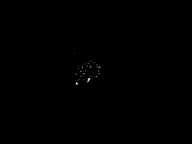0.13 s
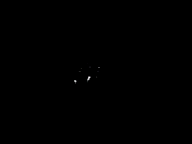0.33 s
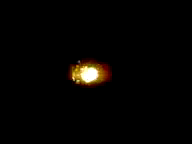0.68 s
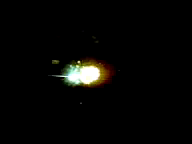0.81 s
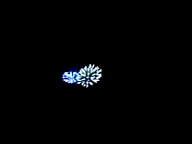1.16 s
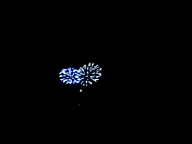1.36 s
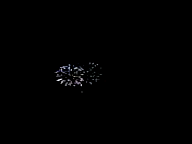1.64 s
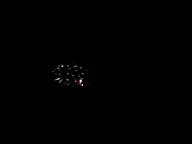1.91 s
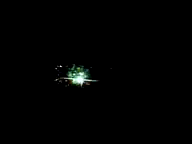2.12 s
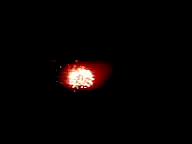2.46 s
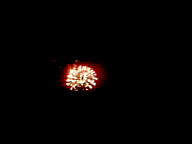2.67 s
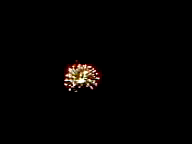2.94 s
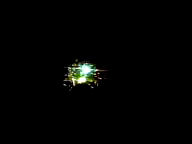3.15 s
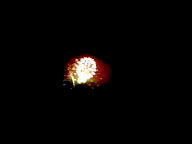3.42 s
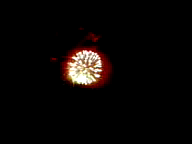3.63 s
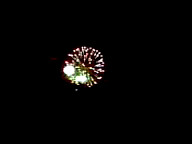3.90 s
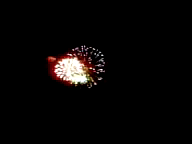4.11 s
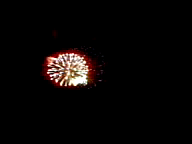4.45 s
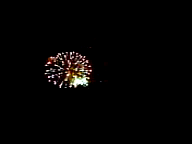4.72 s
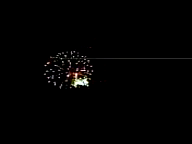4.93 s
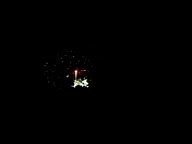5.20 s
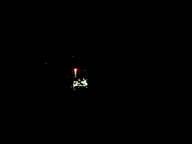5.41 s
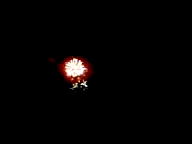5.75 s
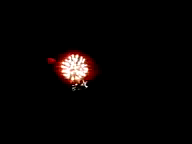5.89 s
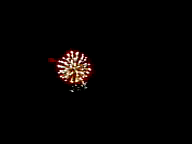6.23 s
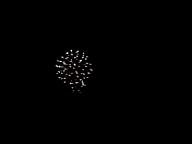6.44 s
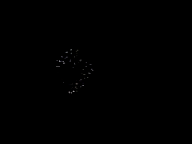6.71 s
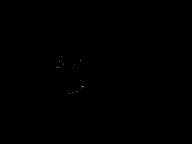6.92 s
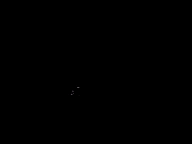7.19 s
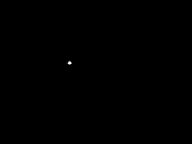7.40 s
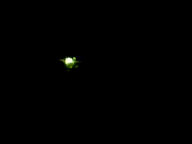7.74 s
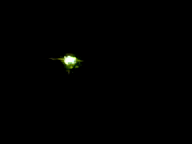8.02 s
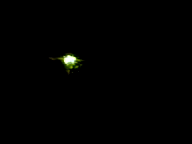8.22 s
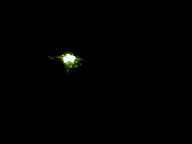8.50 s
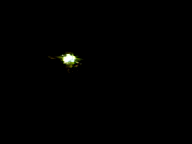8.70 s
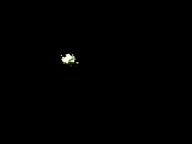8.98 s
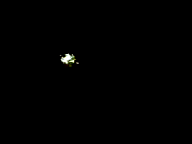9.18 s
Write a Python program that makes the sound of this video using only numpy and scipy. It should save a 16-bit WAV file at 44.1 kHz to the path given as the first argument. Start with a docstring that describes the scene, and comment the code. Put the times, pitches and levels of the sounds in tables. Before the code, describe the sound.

Fireworks at night, heard from afar in a built-up neighbourhood through a small, boxy microphone with little deep bass or treble. A faint, nearly steady rumble and slight hiss lie underneath. A moderate bang opens at 0 s and fades. Weak pops tick at 0.5 to 1.05 s, then stronger ringing mortar cracks at 1.2 and 1.3 s. Big clipped shell booms hit at 1.55 and 1.9 s, with another launch crack overlapping the second, and a hollow mortar shot at 2.5 s. More booms follow at 3.2, 3.65 (a bit lighter), 4.25 and 5.0 s, with a weaker crack at 4.1 s. A short dry mortar crack comes at 5.8 s, then a heavy boom at 6.6 s with a smeared echo. Each boom has rapid wall slaps and a rolling decay under a second. After near quiet, a softer, duller-edged, higher-pitched bang sounds at 8.4 s and fades into rumble.

```python
"""A neighbourhood at night, with fireworks heard from afar over a faint, nearly steady rumble.
Smeared late echoes, short or long: each starts at once without an added click, then dies away.
Mortars crack on the ground: each shot is a sharp front, a ringing tube and echoes from fixed walls.
Shells boom overhead: a shock front, a burst of near echoes, wall returns and a long far roll.
A small, narrow-band microphone colours it all, clips the loudest bangs and adds a little hiss."""
import sys
import numpy as np
from scipy import signal
from scipy.fft import rfft, irfft
from scipy.io import wavfile
from scipy.ndimage import uniform_filter1d

SR = 44100
rng = np.random.default_rng(int(sys.argv[2]) if len(sys.argv) > 2 else 0)


def store_pcm(level_fs):
    """Save levels as 16-bit WAV."""
    pcm = np.round(np.clip(level_fs, -1, 1) * 32767).astype(np.int16)
    wavfile.write(sys.argv[1], SR, np.atleast_2d(pcm).T)


N = 412776

# All levels in the event and wall tables are relative; offsets further down are added to them.
# Shells bursting in the air: (time [s], front level [dB], edge [dB], ring pitch [Hz], ring [dB],
# crack of the far roll [dB], near echoes [dB], far roll [dB], far roll fade [dB/s],
# last far echo after the burst [s], wall returns [dB], hold of near echoes [s], crack of near echoes [dB])
SHELL_BURSTS = [(0.003, -6, -0.5, 352.6, 6, 4.5, -24, -26.5, 42.5, 0.89, -22, 0.011, 0),
                (1.557, 5.5, 2, 347.5, 4, 3, -10.5, -20.5, 54, 0.76, -2.5, .035, 0.3),
                (1.913, 6, 4, 341, 7, 4, -11.5, -27, 34, 0.68, -1.5, 0.016, 1),
                (3.233, 5, -1.5, 268, 6.5, 2, -9, -20, 50, 0.395, 1, 0.028, -0.5),
                (3.649, 1, -0.5, 422.5, -2.5, 1.5, -14, -23.5, 83, .5, -15, 0.0067, 4.5),
                (4.24, -0.5, 2.5, 279, 2.5, 3, -10, -22, 48, 0.56, 0, 0.024, -1.5),
                (4.993, 7, -1, 320, 3.5, 1.5, -10.5, -18, 56, 0.44, -2.5, 0.0313, 1.8),
                (6.627, 7.5, 0, 327.8, -1, 0, -9, -22.5, 39.5, 0.67, -2, 0.027, 0.34),
                (8.368, -5, -8.5, 620, 1, 1, -18, -23, 77.5, 0.8, -8.5, 0.024, 1)]
# Walls that return each burst: (delay [s], level [dB], crack [dB], smear [s])
SHELL_WALLS = [(.012, -4, 2, .011), (0.0224, 1.5, 2, .012), (.034, -5, -1, .01), (.06, -17.5, 2, .012),
               (0.086, -3.5, -5, 0.015)]
# Mortars firing on the ground: (time [s], level [dB], crack [dB], edge [dB], extra fade [dB/s],
# ring pitch [Hz], ring [dB], scattered echoes [dB], muzzle and near walls [dB], far walls [dB])
MORTAR_SHOTS = [(0.5064, -27, -3, 11.5, -5, 1670, 6.5, -13.5, 2, 0),
                (0.7657, -27.5, -3.5, 1.5, -1, 1626, 0, -16.5, -1, -2),
                (1.0522, -38, -4.5, -4.5, -1.5, 1800, 9, -18.5, -2.5, -5),
                (1.1831, -13, 1, -7, -1.5, 1644, 5, -17, 0.1, -3.5),
                (1.2728, -8, 9, 2, 3, 1401, 13, -21, 1, -2),
                (1.7788, -24.5, -8.5, 4.5, 4.5, 1800, 11.5, -15, 3, 0.5),
                (1.9302, -5.5, -1.5, -9.5, 9.5, 1725, 7, -21, -0.1, 0.2),
                (2.4719, -6, -4, -3.5, -6.5, 1732, -0.5, -21, 2, 0),
                (4.1068, -17, 9.5, 2.46, -0.7, 1497, 7.5, -17.5, 4, 7),
                (4.94, -42.5, 0.3, 7, 3.5, 1657, 1, -16, -2, -6.5),
                (5.8175, -8.5, 0.4, -1.3, 26, 1656, 0, -12, 1.5, 1)]
# Walls that return each mortar shot: (delay [s], crack and ring [dB], front [dB], smeared part [dB], smear [s])
MORTAR_WALLS = [(.0045, 1.5, -3.2, 0.6, 0.0023), (0.028, -0.2, -9.5, -3, 0.0037),
                (0.0335, 1.25, -2.66, 2.5, 0.0034), (0.0879, -1, 1, 2, 0.0056), (.112, 0.86, -12, 3, .012),
                (0.273, 2, -60, -20, 0.049)]
# Smeared late echoes, short or long: (time [s], level [dB], crack [dB], smear [s], ring [dB])
LATE_ECHOES = [(0.648, -34, 12, 0.11, 21), (0.854, -27, 3.5, 0.036, 0), (1.527, -15.5, 3, 0.0167, -1),
               (2.858, -43, 5, 0.048, 23), (4.714, -28.5, 9.5, 0.11, -13), (5.099, -26.5, 0, 0.33, -9),
               (5.428, -24, 6, 0.061, 5.5), (6.099, -35, 3, .054, 5), (6.705, -5.5, -1, 0.028, -2),
               (0.046, -8.5, -1.5, 0.018, -12), (6.999, -29.5, 5, 0.11, 8), (7.209, -37, 0, 0.078, -7)]
# Borders between the bands: (thud to boom [Hz], boom to crack [Hz], crack to edge [Hz])
BAND_BORDERS_HZ = (160, 1050, 2300)
# Night rumble before the bands are cut: (thud [dB], boom [dB], crack [dB], edge [dB])
RUMBLE_DB = (-66.5, -64, -64.5, -73)
# Fading of the shell echoes: (thud [dB/s], boom [dB/s], crack [dB/s], edge [dB/s], ring [dB/s])
SHELL_BAND_FADES = (1.5, 4, 0, 5.5, 9)
# Fading of the mortar echoes, before each shot's extra fade:
# (thud [dB/s], boom [dB/s], crack [dB/s], edge [dB/s], ring [dB/s])
MORTAR_BAND_FADES = (1, 1.5, 13, 1.7, 3)
# Shape of the microphone's response: (frequency [Hz], relative level [dB])
MICROPHONE_CURVE = [(18, -60.5), (30, -30.5), (96, -16), (166, -16.5), (317, -4.5), (461, -4.5),
                    (657, -2.5), (776, -5.5), (1230, -5.5), (1610, -2), (1790, -5), (2390, -25),
                    (2710, -25.5), (3200, -16), (4380, -46), (5690, -61.5), (9640, -120)]

SPAN_S, LEAD_S = 1.2, 0.01  # length of each sound, and the part of it before the bang
GRAIN_DB, GRAIN_HZ = 1.5, 250  # fine, fast unevenness of the echoes
LUMP_DB, LUMP_HZ = 2.4, 24.06  # coarser clumps, separate in each band
ECHO_SMEAR_DB = -19.5  # smeared part of shell returns and late echoes

LATE_ECHO_EDGE_DB, LATE_ECHO_RING_HZ = 6.5, 1640

MUZZLE_DELAY_S, MUZZLE_TONE_DB, MUZZLE_SMEAR_S = 0.00058, 0.011, 0.0015
MORTAR_FRONT_DB, MORTAR_SMEAR_DB = 9, -13.5
MORTAR_RING_WIDTH_HZ = 240
MORTAR_PEAK_S, MORTAR_BUILD_DB_S, MORTAR_ROLL_FADE_DB_S = 0.11, 59, 82  # scatter builds up, then fades
FAR_WALL_S = 0.06  # walls with a longer delay count as far

FORERUNNER_S, FORERUNNER_DB = 0.0033, -12  # a weak wave runs ahead of the burst
BURST_FRONT_DELAY_S = 0.0014
BURST_FRONT_DB, RETURN_FRONT_DB, RETURN_RING_DB = 6, 6.5, -2
NEAR_FADE_DB_S, AFTER_FADE_DB_S = 350, 68.5  # added after the hold, and after the last far echo
BURST_RING_WIDTH_HZ = 66

MIC_TOP_HZ, TOP_HZ = 4210, 16000  # cuts before and after the overload
OVERLOAD, HISS_DB = 0.71, -102  # both relative to full scale


def undb(db):
    """Turns decibels into a plain gain."""
    return 10 ** (np.asarray(db) / 20)


def walk(rate, size):
    """A level that slides between random values, rate times a second, with a spread a little below 1."""
    step = int(SR / rate)
    values = np.repeat(rng.standard_normal(size // step + 1), step)
    return 1.06 * uniform_filter1d(values, step)[:size]


def delays():
    """Time after the bang for each sample of its sound; negative before it."""
    return np.arange(int(SPAN_S * SR)) / SR - LEAD_S


def fade_after(start, db_s):
    """A level that holds until start and then falls steadily in dB."""
    return -db_s * np.maximum(delays() - start, 0)


def band_db(db, crack_db, edge_db, ring_db):
    """Levels of thud, boom, crack, edge and ring, one row each."""
    return np.array([db, db, db + crack_db, db + edge_db, db + ring_db]).reshape(5, -1)


def roll(levels_db, fades):
    """Power of many dense echoes, each band dying away at its own pace."""
    fading_db = np.reshape(fades, (-1, 1)) * np.maximum(delays(), 0)
    return undb(2 * (levels_db - fading_db))  # twice the dB turns amplitude into power


def arrival(levels_db, lag, smear):
    """Power of one arrival: a sudden start, then a decaying smear as from rough surfaces."""
    delay = delays() - lag
    return undb(2 * levels_db) * (delay >= 0) * np.exp(-2 * np.abs(delay / smear))


def cut(hz, kind):
    """A gentle filter applied twice, so that neighbouring bands stay in phase."""
    return np.tile(signal.butter(2, hz, kind, fs=SR, output="sos"), (2, 1))


def bands(rows):
    """Keeps each row's own part of the spectrum and joins them; equal rows sum to a flat spectrum."""
    out = rows[3]
    for row, hz in zip(rows[2::-1], BAND_BORDERS_HZ[::-1]):
        above = signal.sosfilt(cut(hz, "highpass"), out)
        below = signal.sosfilt(cut(hz, "lowpass"), row)
        out = above + below
    return out


def bang(power, shocks, ring_hz, width_hz):
    """Uneven noise for the echoes plus single clicks for shock fronts; the fifth row rings at one pitch."""
    size = power.shape[1]
    lumps = np.array([walk(LUMP_HZ, size=size) for _ in power])
    unevenness_db = GRAIN_DB * walk(GRAIN_HZ, size=size) + LUMP_DB * lumps
    # all rows share one noise
    air = np.sqrt(power) * undb(unevenness_db) * rng.standard_normal(size)
    for lag, levels_db in shocks:
        air[:, int((LEAD_S + lag) * SR)] += undb(levels_db[:, 0])
    ring = signal.lfilter(*signal.iirpeak(ring_hz, ring_hz / width_hz, fs=SR), air[4])
    return bands(air[:4]) + ring


def add(out, s, sound):
    """Mixes a sound in from time s on, leaving off what falls outside."""
    at = int(s * SR) + np.arange(len(sound))
    inside = (at >= 0) & (at < N)
    out[at[inside]] += sound[inside]


def night_rumble():
    """Faint noise shaped by bands, whose level drifts slowly by about a decibel."""
    level_db = np.array(RUMBLE_DB)[:, None] + walk(1, size=N)
    return bands(undb(level_db) * rng.standard_normal(N))


def late_echo(db, crack_db, smear, ring_db):
    """A smeared echo with no separate click: noise that starts at once and decays."""
    levels_db = band_db(db, crack_db, LATE_ECHO_EDGE_DB, ring_db)
    power = arrival(levels_db + ECHO_SMEAR_DB, 0, smear)
    return bang(power, [], LATE_ECHO_RING_HZ, LATE_ECHO_RING_HZ / 5)


def mortar(db, crack_db, edge_db, fade, ring_hz, ring_db, roll_db, near_db, far_db):
    """A ground shot: the tube rings, walls return it one by one, and the rest scatters."""
    build_db = MORTAR_BUILD_DB_S * np.minimum(delays() - MORTAR_PEAK_S, 0)
    scatter_db = roll_db + build_db + fade_after(MORTAR_PEAK_S, MORTAR_ROLL_FADE_DB_S)
    levels_db = band_db(db + scatter_db, crack_db, edge_db, ring_db)
    power = roll(levels_db, np.add(MORTAR_BAND_FADES, fade))
    power = power * (delays() > MORTAR_WALLS[0][0])  # scatter starts with the first wall
    shocks = []
    muzzle = (MUZZLE_DELAY_S, MUZZLE_TONE_DB, 0, 0, MUZZLE_SMEAR_S)
    for lag, tone_db, front_db, smear_db, smear in [muzzle, *MORTAR_WALLS]:
        place_db = far_db if lag > FAR_WALL_S else near_db
        levels_db = band_db(db + place_db, crack_db + tone_db, edge_db, ring_db + tone_db)
        power = power + arrival(levels_db + MORTAR_SMEAR_DB + smear_db, lag, smear)
        shocks.append((lag, levels_db + MORTAR_FRONT_DB + front_db))
    return bang(power, shocks, ring_hz, MORTAR_RING_WIDTH_HZ)


def shell_burst(front_db, edge_db, ring_hz, ring_db, crack_db, near_db, far_db, fade, last, walls_db,
                hold, near_crack_db):
    """A shell overhead: weak forerunner, shock front, near echoes, wall returns and a far roll."""
    early_db = FORERUNNER_DB * (delays() < 0)
    near_level_db = near_db + early_db + fade_after(hold, NEAR_FADE_DB_S)
    near = band_db(near_level_db, near_crack_db, edge_db, ring_db)
    far_level_db = far_db + early_db + fade_after(0, fade) + fade_after(last, AFTER_FADE_DB_S)
    far = band_db(far_level_db, crack_db, edge_db, ring_db)
    power = roll(near, SHELL_BAND_FADES) + roll(far, SHELL_BAND_FADES)
    power = power * (delays() >= -FORERUNNER_S)
    shocks = [(BURST_FRONT_DELAY_S, band_db(front_db + BURST_FRONT_DB, 0, edge_db, ring_db))]
    for lag, db, tone_db, smear in SHELL_WALLS:
        levels_db = band_db(walls_db + db, tone_db, edge_db, ring_db + RETURN_RING_DB)
        power = power + arrival(levels_db + ECHO_SMEAR_DB, lag, smear)
        shocks.append((lag, levels_db + RETURN_FRONT_DB))
    return bang(power, shocks, ring_hz, BURST_RING_WIDTH_HZ)


def fireworks():
    """Places every late echo, mortar shot and shell burst at its time."""
    out = np.zeros(N)
    sources = ((LATE_ECHOES, late_echo), (MORTAR_SHOTS, mortar), (SHELL_BURSTS, shell_burst))
    for table, source in sources:
        for s, *settings in table:
            add(out, s - LEAD_S, source(*settings))
    return out


def scene():
    """The night rumble and the fireworks together, as one channel."""
    return (night_rumble() + fireworks())[None]


def microphone(size=4096):
    """Microphone response with its resonances, never sounding ahead of the input; its energy is one."""
    hz, db = np.transpose(MICROPHONE_CURVE)
    log_hz = np.log(np.fft.rfftfreq(size, 1 / SR) + 1)
    log_gain = np.interp(log_hz, np.log(hz), db) * np.log(10) / 20
    # folding the cepstrum (the spectrum of the log gain) onto positive times gives minimum phase
    cepstrum = irfft(log_gain)
    cepstrum[1:size // 2] *= 2
    cepstrum[size // 2 + 1:] = 0
    response = irfft(np.exp(rfft(cepstrum)))
    return response / np.sqrt(np.sum(response ** 2))


def record(dry):
    """Narrow-band microphone, hard clipping on overload, a treble cut, then faint converter hiss."""
    coloured = signal.fftconvolve(dry, microphone()[None])[:, :N]
    heard = signal.sosfilt(signal.ellip(8, 0.5, 80, MIC_TOP_HZ, fs=SR, output="sos"), coloured)
    clipped = np.clip(heard, -OVERLOAD, OVERLOAD)
    out = signal.sosfilt(signal.ellip(8, 0.2, 70, TOP_HZ, fs=SR, output="sos"), clipped)
    return out + undb(HISS_DB) * rng.standard_normal(out.shape)


dry = scene()
out = record(dry)
store_pcm(out)
```